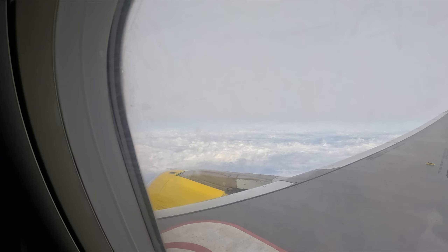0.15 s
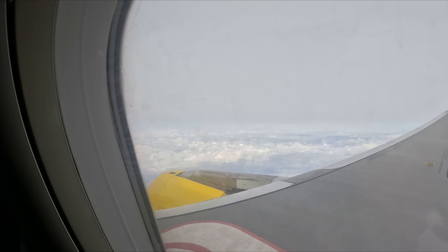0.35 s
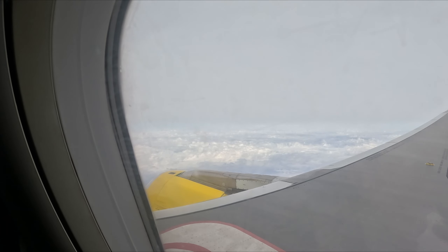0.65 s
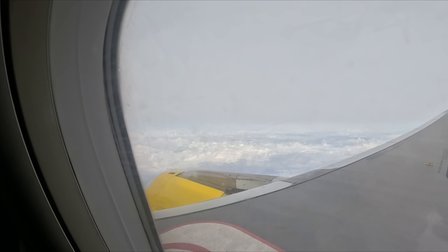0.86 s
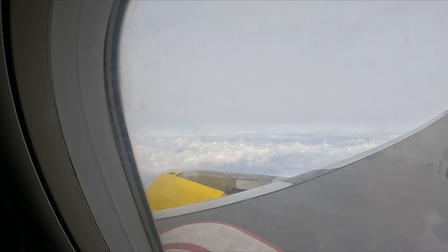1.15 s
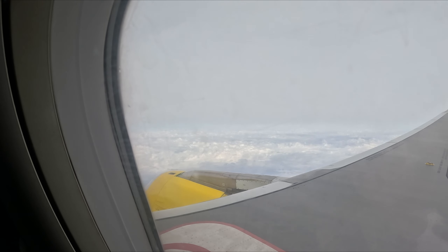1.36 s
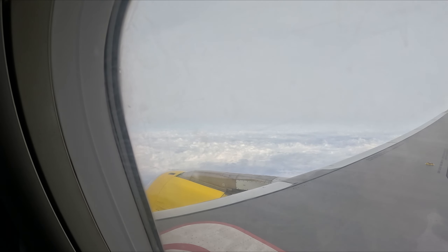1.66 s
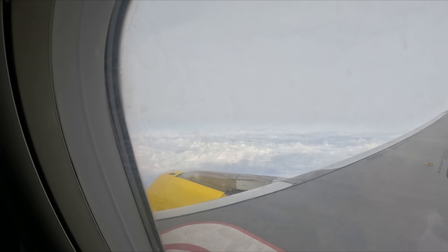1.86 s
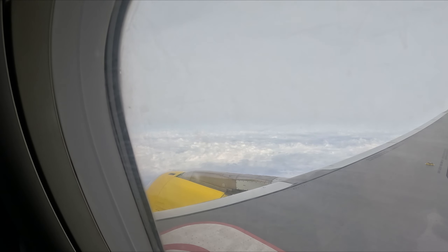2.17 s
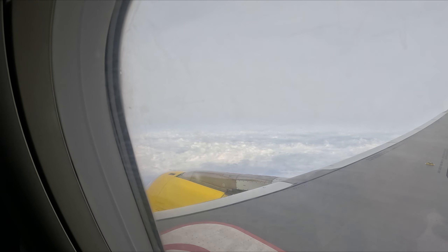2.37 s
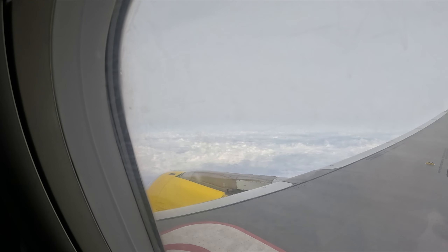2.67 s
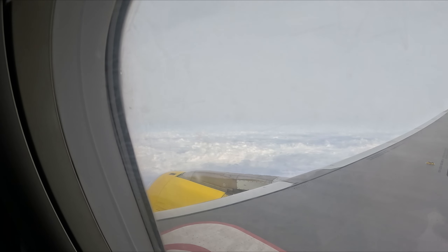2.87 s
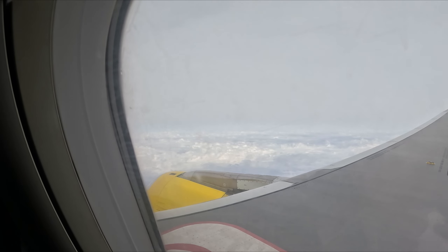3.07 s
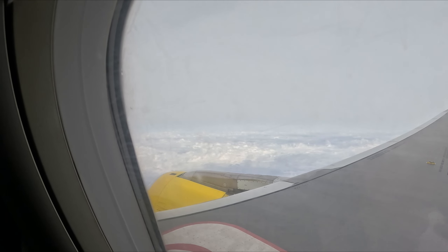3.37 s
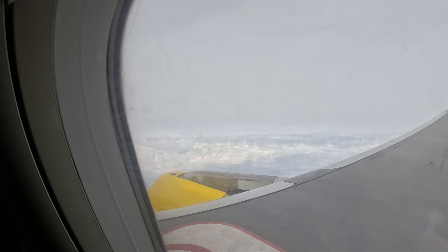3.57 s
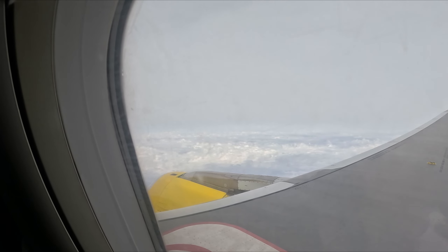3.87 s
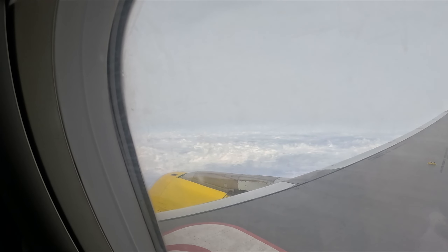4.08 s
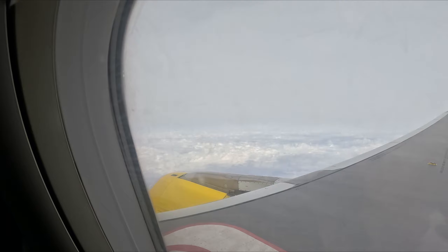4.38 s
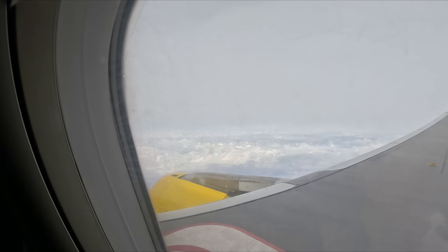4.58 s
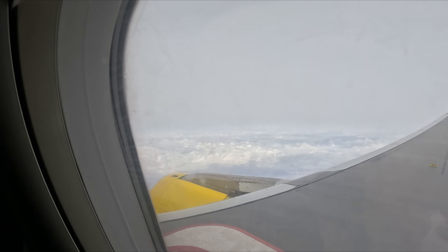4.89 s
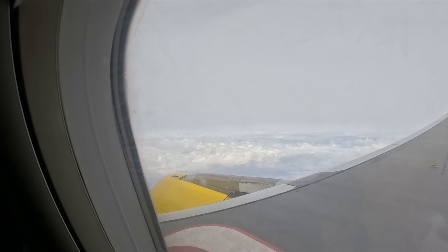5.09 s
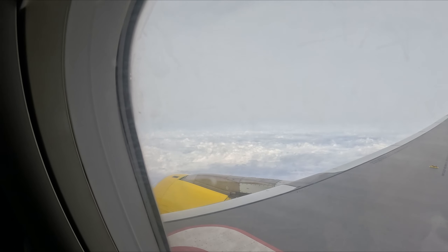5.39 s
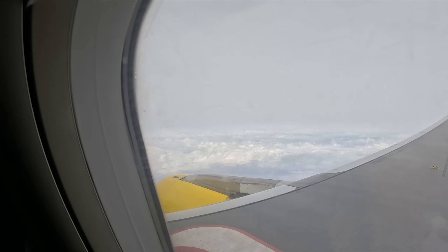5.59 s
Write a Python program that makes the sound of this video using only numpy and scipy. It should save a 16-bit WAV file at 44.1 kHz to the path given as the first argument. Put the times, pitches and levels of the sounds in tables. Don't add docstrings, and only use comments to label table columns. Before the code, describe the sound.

A continuous airliner cabin drone at cruise, heard beside the window from 0 to about 5.7 seconds. Deep, broad jet rumble dominates, with bass resonances and a muffled rush of outside air through the wall, swelling only slightly. Low engine hums near 82 and 164 hertz throb together, the lower one a bit stronger towards the end. A faint steady pump whine and very weak higher motor tones lie beneath, with soft vent hiss. A thin breathy whistle around 3.6 kilohertz dips near 1.1 seconds, returns, then fades after 3. Tiny plastic trim ticks are scattered: a faint bright one at 0.9, the sharpest click at 2.66, smaller ones until 2.9, a little cluster near 3.5, then barely audible ones. The stereo microphone gives wide bass-heavy sound with subdued treble, and the drone ends as abruptly as it began.

```python
import sys
import numpy as np
from scipy import signal
from scipy.fft import rfft, irfft, next_fast_len
from scipy.io import wavfile
from scipy.ndimage import uniform_filter1d, map_coordinates

SR = 44100
rng = np.random.default_rng(int(sys.argv[2]) if len(sys.argv) > 2 else 0)


def wav_record(signal):
    frames = np.transpose(np.atleast_2d(signal))
    bounded = np.clip(frames, -1, 1)
    quanta = np.round(bounded * 32767).astype(np.int16)
    wavfile.write(sys.argv[1], SR, quanta)


def rack_gain(trim_db):
    fader = np.asarray(trim_db, float)
    return 10 ** (fader / 20)


N = 253134


def unit(x):
    return x / np.sqrt(np.mean(x ** 2) + 1e-20)


def along(points, hz):
    f, v = np.transpose(points)
    return np.interp(np.log(hz + 1), np.log(f + 1), v)


def wobble(rate):
    knots = rng.standard_normal(int(N * rate / SR) + 4)
    return map_coordinates(knots, [np.arange(N) * rate / SR])


def filtered(x, response):
    m = next_fast_len(N + 8192)
    return irfft(rfft(x, m) * response(np.fft.rfftfreq(m, 1 / SR)), m)[..., :N]


def closed(points, hz):
    below = (points[0][0] / 2, -90)
    above = (points[-1][0] * 1.3, -110)
    return rack_gain(along([below] + list(points) + [above], hz))


# (frequency [Hz], correlation [0-1])
PORT_CORRELATION = [(60, .9988), (140, .994), (220, 0.98), (500, .95), (900, .89), (1340, .77), (2480, .57),
                    (4600, .74), (9000, 0.42)]
# (frequency [Hz], level difference [dB])
PORT_LEVEL = [(120, 0), (260, -1), (410, -.6), (670, 1.1), (1760, .2), (2850, 3.5), (4620, 2), (8000, 3)]
# (frequency [Hz], phase [rad])
PORT_PHASE = [(300, 0), (1460, .3), (1810, -.3), (2670, -.8), (3270, -.9), (3960, -.3), (4820, .1),
              (8000, 0)]


def rush(spectrum, patchy_db):
    z = signal.stft(rng.standard_normal((2, N)), nperseg=512)[2]
    field = uniform_filter1d(rng.standard_normal(z.shape[1:]), size=6, axis=0)
    field = uniform_filter1d(field, size=10, axis=1)
    pair = signal.istft(z * rack_gain(patchy_db * unit(field)), nperseg=512)[1][:, :N]

    def mid_side(hz):
        angle = np.arccos(np.clip(along(PORT_CORRELATION, hz), 0, 1)) / 2
        return closed(spectrum, hz) * np.array([np.cos(angle), np.sin(angle)])

    def ports(hz):
        level, phase = along(PORT_LEVEL, hz), along(PORT_PHASE, hz)
        return np.array([rack_gain(k * level) * np.exp(1j * k * phase) for k in (.5, -.5)])

    mid, side = filtered(pair, mid_side)
    return unit(filtered(np.array([mid + side, mid - side]), ports))


# (frequency [Hz], density [dB per Hz])
JET_SPECTRUM = [(14, -31), (27, -5), (34, -11.5), (49, 1.5), (72, -7.5), (100, -0.5), (120, -4), (155, -5),
                (178, 0.5), (225, -6.5), (278, -2.5), (320, -9.5), (345, -6.5), (430, -17)]


def jet_rumble(swell_db):
    return rack_gain(-17.5 + swell_db) * rush(JET_SPECTRUM, patchy_db=-0.3)


# (frequency [Hz], density [dB per Hz])
WALL_SPECTRUM = [(330, -19.5), (420, -3), (500, 0.5), (620, -6.5), (700, -5), (800, -11), (885, -12),
                 (915, -4), (1050, -11), (1300, -14), (1500, -19), (1790, -21.5), (1880, -28.5),
                 (2300, -46.5)]


def wall_roar(swell_db):
    return rack_gain(-26.5 + swell_db) * rush(WALL_SPECTRUM, patchy_db=0.22)


# (frequency [Hz], density [dB per Hz])
VENT_SPECTRUM = [(1500, -22), (1900, -1), (2600, 0), (3200, -4.5), (3580, -5), (3950, -8.5), (4350, -7),
                 (5200, -15), (6300, -21), (7350, -16.5), (8300, -25.5), (10000, -28), (12000, -36.5),
                 (14000, -44.5)]


def vent_hiss():
    return rack_gain(-44.5 + 0.19 * wobble(12)) * rush(VENT_SPECTRUM, patchy_db=0.5)


def airflow():
    swell_depth_db, swells_per_s = 0.43, 2.774
    swell_db = swell_depth_db * wobble(swells_per_s)
    return jet_rumble(swell_db) + wall_roar(swell_db) + vent_hiss()


def tone(hz, db, pan_db, wander_hz):
    cycles = np.cumsum(hz + wander_hz * wobble(3)) / SR + rng.random()
    level = np.sqrt(2) * rack_gain(db + 0.51 * wobble(3.8))
    return level * np.sin(2 * np.pi * cycles) * rack_gain([[pan_db / 2], [-pan_db / 2]])


CORE_HZ, PUMP_HZ = 164.25, 534.4
# (frequency [Hz], rms level [dB], left minus right [dB], wander [Hz])
SHAFT_TONES = [
    (84.5, -38.5, -1, -1),
    (CORE_HZ, -26.5, 0, 0.072),
    (8 * CORE_HZ, -44, -1, 0.15),
    (1321, -59, 3, 2.5),
]
# (multiple of PUMP_HZ, rms level [dB], left minus right [dB], wander [Hz])
PUMP_HARMONICS = [(1, -43, 0.5, 0.35), (3, -58.5, 0.5, 0.19), (4, -65, 0.5, 0.37), (6, -73.5, -13, 0.24)]
# (frequency [Hz], rms level [dB], left minus right [dB], wander [Hz])
MOTOR_WHINES = [(2144.6, -64.5, 2, 1.5), (2603.5, -69, 5, 1), (2965, -70, 4, 5), (7198.8, -83, 9, .5),
                (11080, -91, 3, 8)]
# (time [s], frequency [Hz], rms level [dB])
FAN_COURSE = [(0, 82.0, -23.5), (.8, 81.9, -25), (1.5, 81.65, -25), (2.2, 81.55, -23), (3.1, 81.6, -25),
              (3.8, 81.55, -22.5), (5.74, 81.5, -22)]


def machinery():
    pump = [(k * PUMP_HZ, *rest) for k, *rest in PUMP_HARMONICS]
    t = np.arange(N) / SR
    s, hz, db = np.transpose(FAN_COURSE)
    fan = tone(np.interp(t, s, hz), np.interp(t, s, db), pan_db=0, wander_hz=0)
    return fan + sum(tone(*row) for row in SHAFT_TONES + pump + MOTOR_WHINES)


# (time [s], peak level [dB], left minus right [dB], decay T60 [s], brightness [dB])
TRIM_TICKS = [(0.8892, -52, 3, .02, 7), (1.478, -60, 5, .012, 4), (1.9605, -58, 4, .008, 3),
              (2.6591, -34.5, 4, 0.01, 1), (2.661, -45, 3, .01, -3), (2.76, -61, 4, .012, 5),
              (2.81, -49, 4, 0.016, -5), (2.91, -42, 2.5, .008, -3), (3.2985, -51, 0, .015, -3),
              (3.473, -54, 6, .02, -4), (3.479, -46, 4, .03, 0), (3.484, -46, 3.5, .025, -2),
              (3.72, -59, 3, .015, 3), (4.15, -61, 3, .012, 5), (4.455, -64, 3, .01, 4.5),
              (4.9287, -57, 4, .015, 5), (5.1198, -58, 4, .008, 3), (5.4935, -58, 4, .008, 3)]
# (frequency [Hz], gain [dB])
TICK_BODY = [(1800, -16), (3200, -1), (4500, 0), (6000, -1), (7500, -6), (8500, -17), (10000, -30)]
# (frequency [Hz], gain [dB])
TICK_EDGE = [(7500, -22), (9500, -18), (10800, -22), (12200, -18), (13300, -30), (14500, -38), (15600, -38)]


def trim_ticks():
    slip, rattle = 4, .6
    pane_s, pane_db = 0.0051, -6
    recess_s, recess_db, recess_t60 = 0.0057, -9.5, 0.043
    t = np.arange(2000) / SR
    body, edge = np.zeros((2, N + SR)), np.zeros((2, N + SR))
    for s, db, pan_db, t60, bright_db in TRIM_TICKS:
        crack = slip * (t == 0) + rattle * rng.standard_normal(len(t)) * rack_gain(-60 * t / t60)
        slap = rack_gain(pane_db) * np.roll(crack, round(pane_s * SR))
        decay = rack_gain(recess_db - 60 * t / recess_t60) * (t > recess_s)
        recess = decay * rng.standard_normal((2, len(t)))
        tick = rack_gain(db + 10.5) * (crack + slap + recess) * rack_gain([[pan_db / 2], [-pan_db / 2]])
        span = slice(round(s * SR), round(s * SR) + len(t))
        body[:, span] += tick
        edge[:, span] += rack_gain(bright_db) * tick
    dull = filtered(body[:, :N], lambda hz: closed(TICK_BODY, hz))
    return dull + filtered(edge[:, :N], lambda hz: closed(TICK_EDGE, hz))


# (time [s], rms level [dB])
WHISTLE_LEVEL = [
    (0, -59.5),
    (.6, -59),
    (1.1, -64),
    (1.6, -61),
    (2.8, -61),
    (3.2, -66),
    (5.74, -67),
]


def whistle():
    centre_hz, width_hz = 3578, 45
    breath = filtered(rng.standard_normal(N), lambda hz: 1 / (1 + (2 * (hz - centre_hz) / width_hz) ** 2))
    level_db = np.interp(np.arange(N) / SR, *np.transpose(WHISTLE_LEVEL))
    return rack_gain(level_db) * unit(breath) * rack_gain([[1.5], [-1.5]])


# (time [s], rms level [dB])
HIGH_PUFFS = [(.43, -95), (.56, -92), (.9, -91), (1.0, -92), (1.475, -91), (2.75, -93), (2.91, -92),
              (3.46, -95), (3.72, -91), (4.15, -92), (4.27, -94), (4.46, -93), (4.91, -92), (5.49, -92)]
# (frequency [Hz], gain [dB])
PUFF_COLOUR = [(13900, -12), (14400, -2), (15600, 0), (15750, -30)]


def high_puffs():
    t, half_s = np.arange(N) / SR, .010
    puffs = sum(rack_gain(db) * np.exp(-((t - s) / half_s) ** 2) for s, db in HIGH_PUFFS)
    hiss = unit(filtered(rng.standard_normal(N), lambda hz: closed(PUFF_COLOUR, hz)))
    return puffs * hiss * rack_gain([[1.5], [-1.5]])


def scene():
    return airflow() + machinery() + trim_ticks() + whistle() + high_puffs()


def roll_off(x):
    return signal.sosfilt(signal.butter(12, 15700, fs=SR, output="sos"), x)


def record(dry):
    squeeze, memory_s = 0.39, 0.022
    ceiling, knee = 0.72, 3.3
    fade_s = .003
    power, keep = np.mean(dry ** 2, axis=0), np.exp(-1 / (memory_s * SR))
    mean = power.mean()
    sensed = signal.lfilter([1 - keep], [1, -keep], power - mean) + mean
    even = dry * (sensed / mean) ** (-squeeze / 2)
    soft = even / (1 + np.abs(even / ceiling) ** knee) ** (1 / knee)
    to_end = np.minimum(np.arange(N), np.arange(N)[::-1])
    edges = np.clip(to_end / (fade_s * SR), 0, 1)
    return roll_off(soft * np.sin(np.pi / 2 * edges) ** 2)


dry = scene()
out = record(dry)
wav_record(out)
```